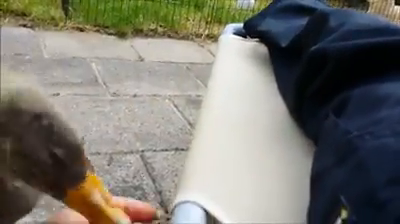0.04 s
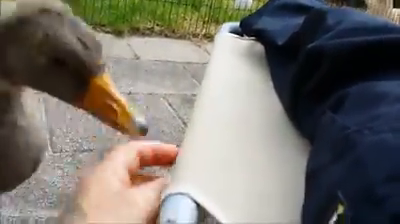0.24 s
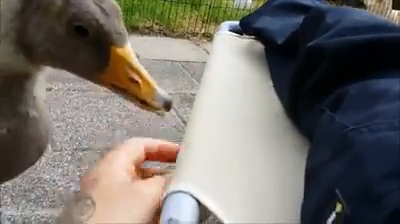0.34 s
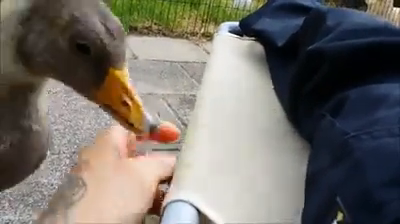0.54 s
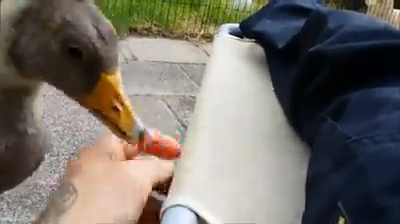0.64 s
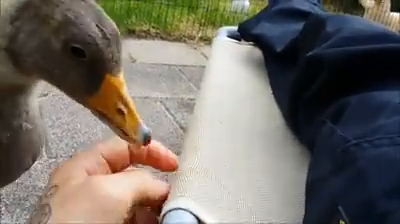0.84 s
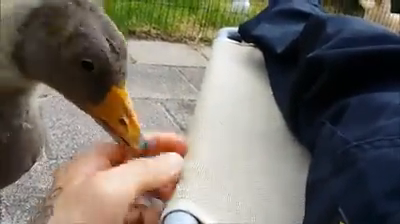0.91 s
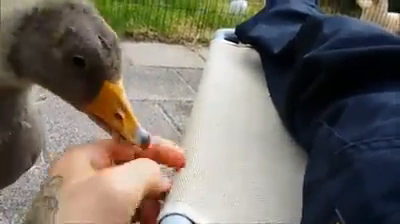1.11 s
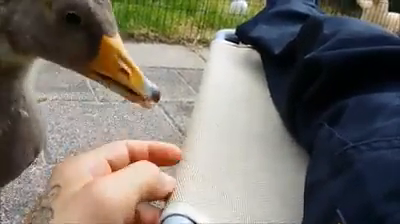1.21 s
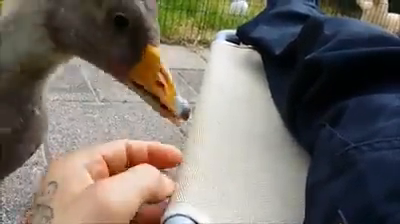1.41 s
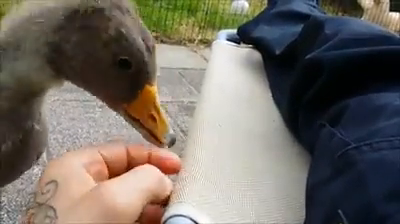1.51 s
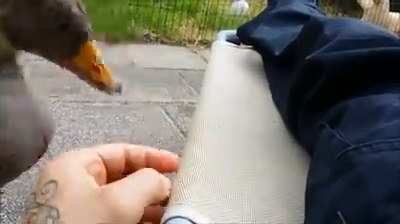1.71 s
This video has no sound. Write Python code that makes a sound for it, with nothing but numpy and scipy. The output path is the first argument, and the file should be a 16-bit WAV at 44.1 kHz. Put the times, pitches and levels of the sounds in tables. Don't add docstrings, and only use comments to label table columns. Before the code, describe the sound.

A goose close to a small stereo microphone peeps ten times, from 0.22 to 1.46 seconds, each call under a tenth of a second, arched, reedy and slightly rough. The calls grow stronger and higher, the last loudest. Breath hisses near 0.65 and 1.35, faint bill ticks at 0.54 and 0.8, and a low grunt around 1.0 sit between. Paving reflects slightly; traffic rumble and leaf hiss swell quietly underneath.

```python
import sys
import numpy as np
from scipy import signal
from scipy.fft import rfft, irfft, next_fast_len
from scipy.io import wavfile
from scipy.ndimage import uniform_filter1d

SR = 44100
rng = np.random.default_rng(int(sys.argv[2]) if len(sys.argv) > 2 else 0)


def persist_wave(psi):
    counts = np.round(np.clip(psi, -1, 1) * 32767).astype(np.int16)
    wavfile.write(sys.argv[1], SR, np.atleast_2d(counts).T)


def volts_from_decibels(level):
    exponent = np.asarray(level, float) / 20
    return 10 ** exponent


N = 77175


def evened(x):
    return x / np.sqrt(np.mean(x ** 2) + 1e-20)


def read(points, hz):
    f, value = np.transpose(points)
    return np.interp(np.log(hz + 1), np.log(f + 1), value)


def add(mix, start_s, sound):
    part = mix[round(start_s * SR):][:len(sound)]
    part += sound[:len(part)]


def bump(u, at, wide):
    return np.exp(-0.5 * ((u - at) / wide) ** 2)


def half_sine(length_s):
    return np.sin(np.pi * np.arange(0, length_s, 1 / SR) / length_s)


def wobble(n, size):
    return evened(uniform_filter1d(uniform_filter1d(rng.standard_normal(n), size), size))


def resonate(x, hz, width_hz):
    turn = np.exp(2j * np.pi * hz * np.arange(len(x)) / SR)
    r = np.exp(-np.pi * width_hz / SR)
    return 2 * (turn * signal.lfilter([1 - r], [1, -r], x / turn)).real


def resonant_noise(n, peaks):
    total = np.zeros(n)
    for hz, width_hz, level_db in peaks:
        once = resonate(rng.standard_normal(n), hz, width_hz)
        total += volts_from_decibels(level_db) * evened(resonate(once, hz, width_hz))
    return evened(total)


def ports(x, balance, lag):
    # hz, lag_rad
    port_lag = [(300, .3), (700, .6), (1050, 1.9), (1700, 2.25), (2400, 4.7), (3450, 9.2), (5600, 13.2),
                (10000, 20)]
    size = next_fast_len(N + 4096)
    hz = np.fft.rfftfreq(size, 1 / SR)
    half = volts_from_decibels(read(balance, hz) / 2) * np.exp(0.5j * lag * read(port_lag, hz))
    return irfft(rfft(x, size) * np.array([half, 1 / half]), size)[:, :N]


def field(spectrum, patchy_db):
    # hz, correlation
    yard_same = [(25, 0.58), (60, 1), (350, 0.76), (700, 0.18), (1100, 0.11), (10000, 0.093)]
    frames, hz = N // 256 + 5, np.fft.rfftfreq(1024, 1 / SR)
    a, b, c, d, patch = rng.standard_normal((frames, 513, 5)).T
    patch = evened(uniform_filter1d(uniform_filter1d(patch, size=8, axis=0), size=12, axis=1))
    same = np.clip(read(yard_same, hz), -1, 1)[:, None]
    left = a + 1j * b
    right = same * left + np.sqrt(1 - same ** 2) * (c + 1j * d)
    level = volts_from_decibels(read(spectrum, hz)[:, None] + patchy_db * patch)
    z = np.array([left, right]) * level
    return evened(signal.istft(z, nperseg=1024, noverlap=768)[1][:, :N])


def yard():
    # hz, density_db
    rumble = [(12, -43.5), (20, -19), (27, -24.5), (59, -17), (113, 9.5), (140, -15), (200, -2), (260, -19),
              (440, -120)]
    # hz, density_db
    roar = [(140, -25), (200, -3), (300, 0), (400, -3), (560, -14), (900, -16), (1200, -40)]
    # time_s, level_db
    traffic = [(0, -65.5), (.35, -56), (.85, -59), (1.05, -52.5), (1.5, -52), (1.75, -61)]
    # hz, density_db
    garden = [(410, 0), (700, -6), (880, 0.5), (965, 1), (2130, -0.5), (4130, -3), (6750, -3.5),
              (10300, -8), (10800, -42.5), (14000, -55), (22000, -120)]
    # time_s, gain_db
    leaves = [(0, 0), (.2, 1.5), (.5, 6.5), (1.1, 5.5), (1.5, 4.5), (1.75, -2)]
    # hz, width_hz, level_db
    drones = [(119.2, 25, -61), (2026, 210, -72.5), (6500, 200, -78)]
    t = np.arange(N) / SR
    bed = volts_from_decibels(-57.5 + 1.03 * wobble(N, size=2500)) * field(rumble, 1.0)
    bed = bed + volts_from_decibels(np.interp(t, *np.transpose(traffic))) * field(roar, 0.93)
    bed = bed + volts_from_decibels(-61 + np.interp(t, *np.transpose(leaves))) * field(garden, 1.9)
    for hz, width_hz, level_db in drones:
        bed = bed + volts_from_decibels(level_db) * resonant_noise(N, [(hz, width_hz, 0)])
    return ports(bed, KEEP_YARD_PORT_DB, 0)


# hz, left_minus_right_db
KEEP_YARD_PORT_DB = [(300, -3.5), (1100, -0.5), (2050, -9), (3400, 2), (5200, 2.5), (6600, 10),
                     (8400, -3.5), (10500, -3)]


def patio(x):
    # delay_s, level_db
    echoes = [(.0032, -26), (.0075, -21), (0.011, -19)]
    tail_db, t60_s = -29, 0.22
    size = SR // 2
    taps = np.zeros((2, size))
    at = np.arange(400, size - 20, 20)
    signs = rng.choice([-1.0, 1.0], (2, len(at)))
    np.put_along_axis(taps, at + rng.integers(0, 20, (2, len(at))), signs, 1)
    taps *= volts_from_decibels(-60 * np.arange(size) / SR / t60_s)
    taps *= volts_from_decibels(tail_db) / np.linalg.norm(taps[0])
    taps[:, 0] = 1
    for delay_s, level_db in echoes:
        taps[[0, 1], [round(delay_s * SR), round(delay_s * SR * 1.07)]] += volts_from_decibels(level_db)
    return signal.fftconvolve(x, taps, axes=1)[:, :N]


def bill_ticks(mix):
    # time_s, level_db, pitch_hz
    ticks = [
        (0.542, -46, 1716),
        (0.7963, -44, 1670),
    ]
    t = np.arange(400) / SR
    for time_s, level_db, hz in ticks:
        add(mix, time_s - 0.003, volts_from_decibels(level_db) * bump(t, 0.0039, 0.00082) * np.sin(2 * np.pi * hz * t))


def throat_grunt(mix):
    # start_s, length_s, level_db, hz, width_hz
    start_s, length_s, level_db, hz, width_hz = (0.84, 0.31, -51.5, 251.5, 51)
    shape = half_sine(length_s)
    add(mix, start_s, volts_from_decibels(level_db) * shape * resonant_noise(len(shape), [(hz, width_hz, 0)]))


def inhales(mix):
    # start_s, length_s, level_db
    breaths = [
        (.015, 0.1, -58),
        (.63, 0.088, -54),
        (.93, 0.07466, -67.5),
        (1.325, 0.097, -51.5),
    ]
    # hz, width_hz, level_db
    inward = [(4750, 550, 0), (3900, 900, -4), (2100, 600, -7)]
    for start_s, length_s, level_db in breaths:
        shape = half_sine(length_s)
        add(mix, start_s, volts_from_decibels(level_db) * shape * resonant_noise(len(shape), inward))


def peep(call, form, strain):
    # multiple, level_db
    overtones = [(2, -19), (3, -23.5), (4, -25.5)]
    # hz, width_hz, level_db
    throat = [(1684, 174, 6.5), (2200, 687, 8.5), (1300, 100, -8)]
    # hz, width_hz, level_db
    bill = [(3620, 560, -4), (5656, 540, 4.5), (7790, 700, 3), (9035, 890, -5.5), (2373, 1400, -20.5),
            (813, 431.9, -4), (6810, 500, -4.5)]
    _, length_s, effort_db, low_hz, high_hz = call
    lean, swell_s, end_hz, high_db, weak = form
    breath_db, late_db, over_db, onset_db, upper_db = strain
    start_hz, high_foot_hz, jitter_hz, shimmer_db = 1297.6, 320.3, 70, 5
    hold_s, fall_s, sag_db, onset_s = 0.005007, 0.003, -5.5, 0.0074
    t = np.arange(0, length_s + 0.016, 1 / SR)
    n, u = len(t), np.minimum(t / length_s, 1)

    v = np.clip((t - hold_s) / (length_s - hold_s), 0, 1)

    def climb(power):
        return np.tanh(1.1 * np.sin(np.pi * v ** power) ** 0.95) / np.tanh(1.1)

    def phase(foot_hz, top_hz, curve):
        hz = foot_hz + (top_hz - foot_hz) * curve + jitter_hz * arch ** 2 * wobble(n, size=60)
        return 2 * np.pi * np.cumsum(hz) / SR

    arch, lead = climb(lean), climb(lean * 0.99)
    foot = start_hz + (end_hz - start_hz) * u
    low = phase(foot, low_hz, arch)
    high = phase(foot + high_foot_hz * np.minimum(u / 0.455, 1), high_hz, lead)

    shim = [volts_from_decibels(shimmer_db * arch ** 2 * (np.tanh(wobble(n, size=130)) - 1.5)) for _ in range(3)]
    low_dips_db = -15 * bump(u, weak, 0.12) - 6.5 * bump(t, 1.675 * hold_s, 0.0013565)
    a = volts_from_decibels(low_dips_db) * shim[0]
    b = volts_from_decibels(high_db) * np.clip(np.minimum((u - 0.078) / 0.16, (1 - u) / 0.089), 0, 1) ** 2 * shim[1]

    sides = volts_from_decibels(max(upper_db, -13)) * shim[2] * arch ** 3 * np.cos(2 * high - low)
    sides = sides + volts_from_decibels(-20) * arch * np.cos(2 * low - high)
    rasp = volts_from_decibels(-11) * arch ** 2 * wobble(n, size=14) * np.cos(high)
    folds = a * np.cos(low) + b * (np.cos(high) + sides + rasp)
    edges = np.clip(np.minimum(t / swell_s, (length_s - t) / fall_s), 0, 1) ** 1.06
    shape = volts_from_decibels(effort_db + sag_db * u) * edges
    voice = volts_from_decibels(-2.5) * folds * shape
    for hz, width_hz, level_db in throat:
        voice = voice + volts_from_decibels(level_db) * resonate(folds * shape, hz, width_hz)

    push = bump(u, 0.41, 0.11) + volts_from_decibels(-12) * arch + volts_from_decibels(late_db) * bump(u, 0.798, 0.069)
    over = np.zeros(n)
    for k, level_db in overtones:
        pair = a * np.cos(k * low) + b * np.cos(high + (k - 1) * low)
        over += volts_from_decibels(level_db + over_db) * shim[k % 2] * pair
    over = push * over * (1 - 0.6 / 2 + 0.6 * wobble(n, size=40))
    over = 0.78 * over + sum(2.1144 * resonate(over, hz, 1.64 * width_hz) for hz, width_hz, _ in bill[:3])
    over = over + volts_from_decibels(-12.5 + onset_db) * np.cos(2 * low) * bump(t, onset_s / 2, onset_s / 3)
    gust = volts_from_decibels(-17.5 + breath_db + 4.8 * np.tanh(wobble(n, size=150)))
    puffs = push * (1 + 0.24 * np.cos(high - low)) * shape * gust
    return voice + over * shape, puffs * np.array([resonant_noise(n, bill) for _ in range(3)])


def goose():
    # start_s, length_s, effort_db, low_top_hz, high_top_hz
    calls = [
        (0.223, 0.047, -32, 1770, 1943),
        (.311, 0.071, -31, 1844, 2170),
        (.423, 0.078, -28, 1893, 2220),
        (.553, 0.085, -28, 1933, 2200),
        (0.705, 0.081356, -27, 1910, 2200),
        (0.846, 0.084, -29, 1885, 2220),
        (1.008, .089, -25.5, 1957, 2278),
        (1.137, 0.079, -28, 1926, 2280),
        (1.248, 0.082, -27, 1965, 2370),
        (1.38, 0.083, -25, 2011, 2480),
    ]
    # arch_lean, swell_s, closing_hz, high_voice_db, low_weakest_share
    forms = [(1.1, 0.014, 1320, -2.5, 0.66), (1.15, 0.0063, 1350, -3, .6),
             (1.1, 0.0069, 1252.4, -3.5, 0.62), (0.81, 0.008, 1350, -3, 0.69), (1, .006, 1350, -3.5, 0.69),
             (1, 0.0068, 1310, -4, 0.63), (1.3, 0.0091, 1400, -4.5, 0.72), (1.2, 0.0058, 1230, -3.5, .52),
             (1.05, 0.0051, 1350, -8, 0.64), (1., 0.0061, 1250, -9.5, 0.61)]
    # breath_db, late_breath_db, overtones_db, onset_db, upper_sideband_db
    strains = [(7, -8, 6, -18, -16), (3.5, -4, 5, 1, -26.5), (-0.5, -5.5, 7.5, 5.5, -15),
               (1.5, -10.5, 9, 6, -7.5), (7, -3, 2, 8, -1), (0.5, -11, 4.5, 7, -3.5),
               (-1.5, -7, 5.5, 2.5, -4), (3, -4.5, 4.5, 7.5, -20), (1, -3.5, 5.5, 4, -48),
               (-0.5, -6, 3, 5, -36)]
    clear, airy = np.zeros(N), np.zeros((N, 2))
    for call, form, strain in zip(calls, forms, strains):
        voice, breath = peep(call, form, strain)
        add(clear, call[0], voice + 0.36 * breath[0])
        add(airy, call[0], 0.72 * breath[1:].T)
    inhales(clear)
    throat_grunt(clear)
    bill_ticks(clear)
    return clear + airy.T


def scene():
    # hz, left_minus_right_db
    goose_port_db = [(300, -4), (1100, -8), (2150, -10), (3400, 4), (5200, 2.5), (6500, 9), (8200, -9),
                     (9800, -20)]
    return ports(patio(goose()), goose_port_db, 0.97) + yard()


def top_cut(x):
    return signal.sosfilt(signal.butter(12, 11000, fs=SR, output="sos"), x)


def record(dry):
    lowpass = signal.firwin(255, 10350, window=("kaiser", 8), fs=SR)
    return top_cut(signal.oaconvolve(dry, lowpass[None], "same"))


dry = scene()
out = record(dry)
persist_wave(out)
```